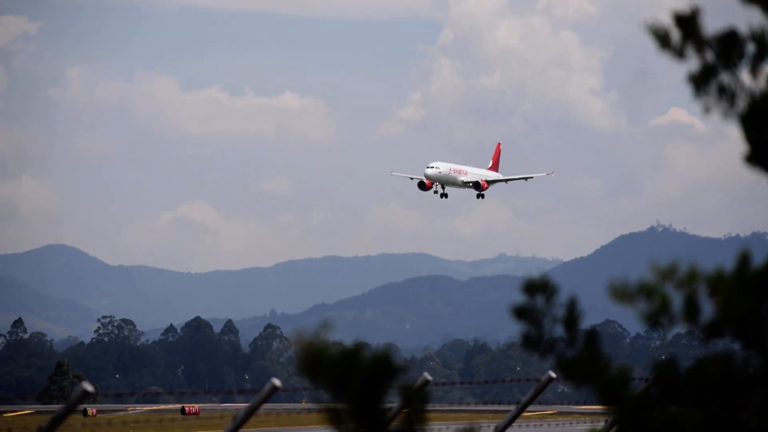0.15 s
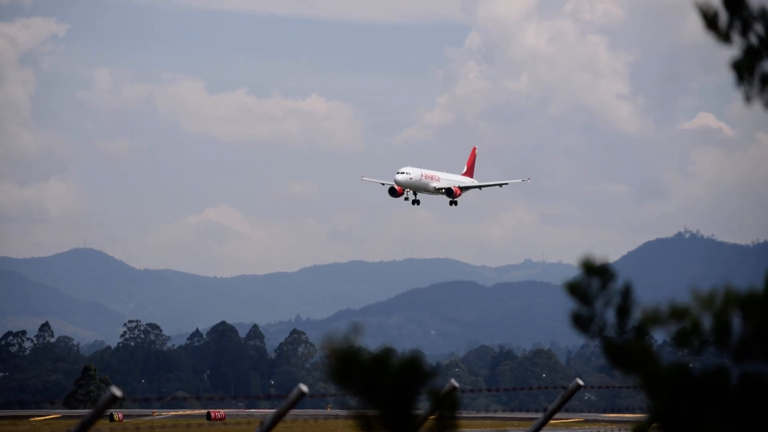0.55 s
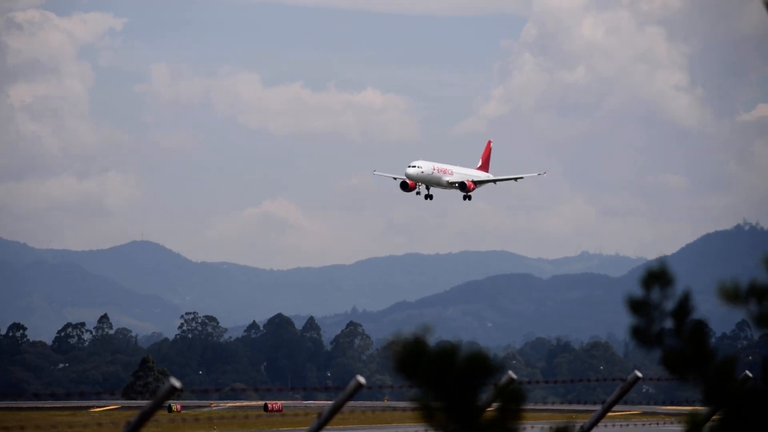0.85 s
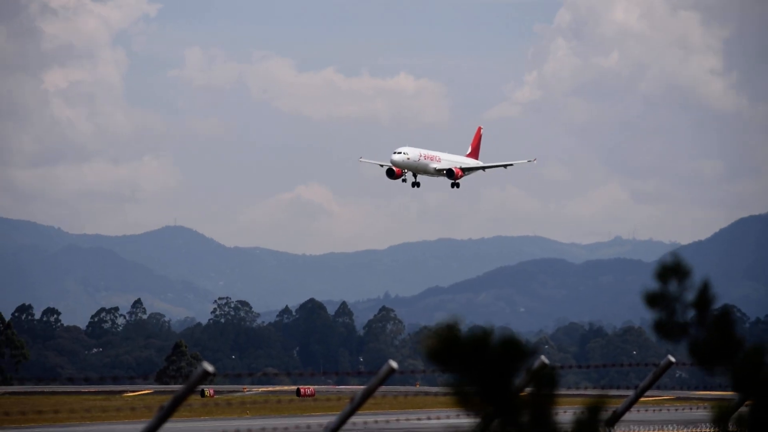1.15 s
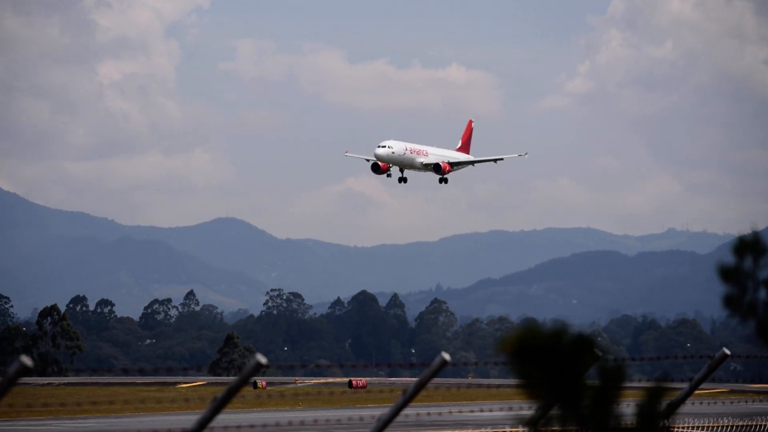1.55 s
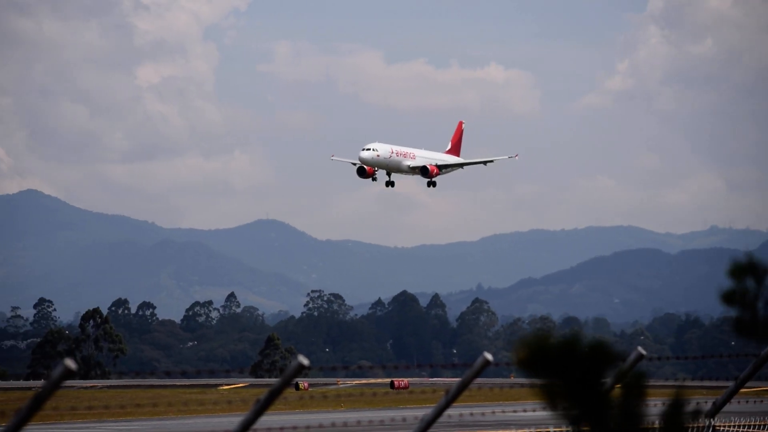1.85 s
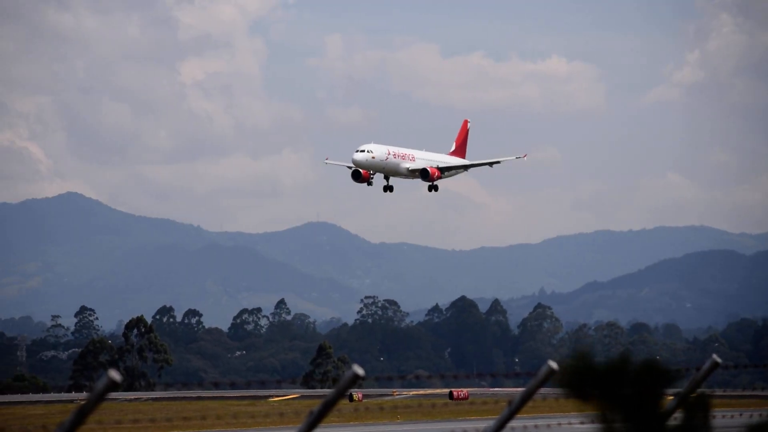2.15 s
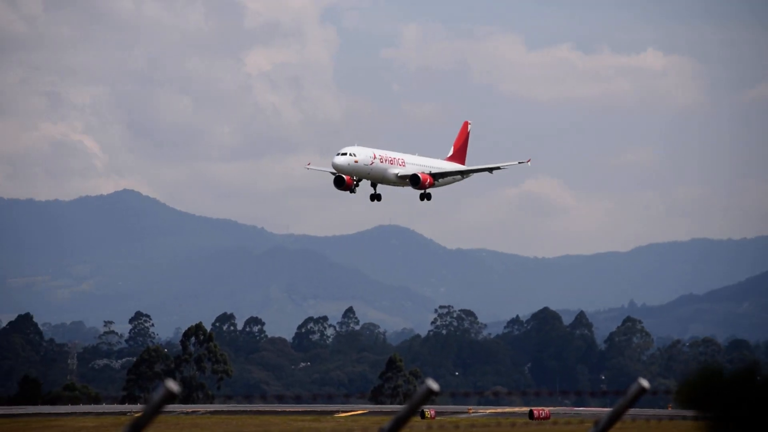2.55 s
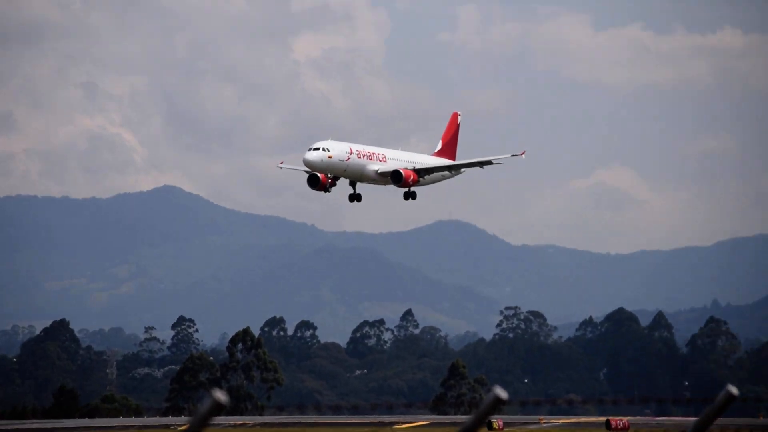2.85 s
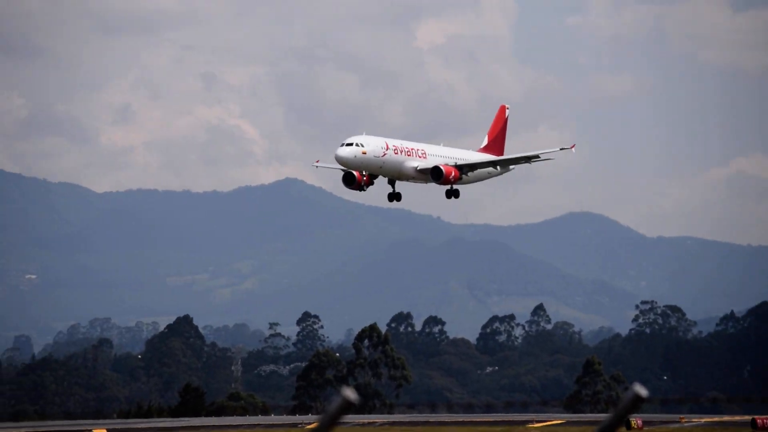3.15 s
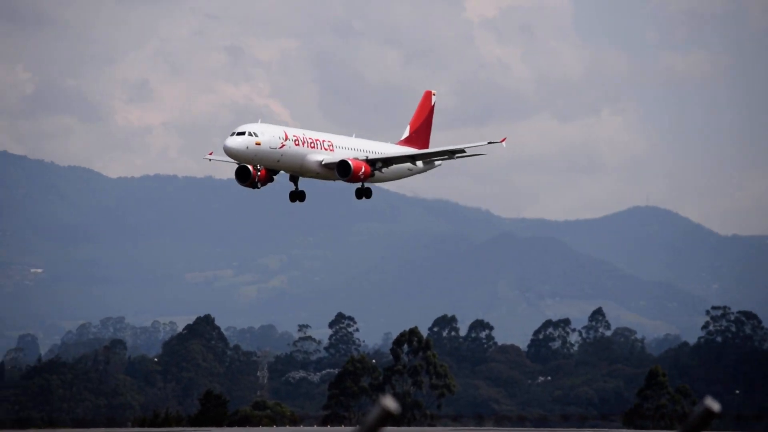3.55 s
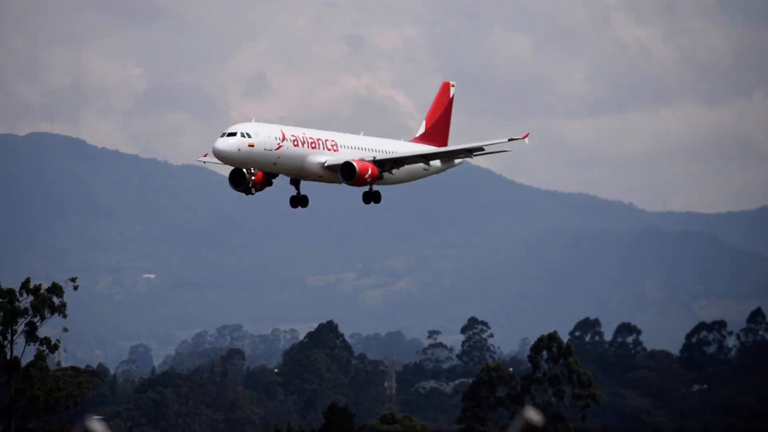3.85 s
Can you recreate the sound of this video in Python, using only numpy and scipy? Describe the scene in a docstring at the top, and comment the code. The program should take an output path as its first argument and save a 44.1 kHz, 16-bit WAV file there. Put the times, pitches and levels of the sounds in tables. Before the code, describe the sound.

Airliner's broad roar and wavering fan whine swell across an airfield, with gusts buffeting the microphone.

```python
"""A jet airliner's roar swells across an airfield on final approach, its fan whine wavering with the throttle.
Gusts break on the microphone as runs of short, dull thumps; the hand-held camera rustles and ticks.
The roar is shaped noise with a ground echo, and the whine is tones scattered by turbulence.
The wind is random eddies over a churn of noise, with single swings of pressure for the hardest blows.
Ticks and cracks are filtered snaps, rustles are grainy noise, and faint electronics hiss and whistle."""
import sys
import numpy as np
from scipy import signal
from scipy.fft import rfft, irfft
from scipy.io import wavfile
from scipy.ndimage import uniform_filter1d

SR = 44100
rng = np.random.default_rng(int(sys.argv[2]) if len(sys.argv) > 2 else 0)


def store_pcm(level_fs):
    """Save levels as 16-bit WAV."""
    pcm = np.round(np.clip(level_fs, -1, 1) * 32767).astype(np.int16)
    wavfile.write(sys.argv[1], SR, np.atleast_2d(pcm).T)


N = 176400
T = np.arange(N) / SR  # time [s]
HZ = np.maximum(np.arange(N // 2 + 1) * SR / N, 1)  # pitch of each spectrum bin, kept above zero


def from_db(db):
    """Decibels to gain."""
    return 10 ** (np.asarray(db) / 20)


def rms_one(x):
    """Scale to rms 1."""
    return x / np.sqrt(np.mean(x ** 2) + 1e-20)


def in_time(rows, outside=None):
    """Join (time [s], value) rows by straight lines."""
    s, value = np.transpose(rows)
    return np.interp(T, s, value, outside, outside)


def coloured(x, spectrum):
    """Filter by (frequency [Hz], level [dB]) points, joined over log frequency."""
    hz, db = np.transpose(spectrum)
    gain = from_db(np.interp(np.log(HZ), np.log(hz), db))
    return irfft(rfft(x) * gain, N)


def noise():
    """White noise with spread 1."""
    return rng.standard_normal(N)


def drift(rate):
    """Slow random wander with rms 1; it thins out above rate [Hz]."""
    slow = rfft(noise()) / (1 + (HZ / rate) ** 2) ** 2
    return rms_one(irfft(slow * (HZ > 1), N))


def band(x, low_hz, high_hz):
    """Causal band-pass."""
    sos = signal.butter(2, [low_hz, high_hz], "band", fs=SR, output="sos")
    return signal.sosfilt(sos, x)


# level of the jet roar, with the opening fade-in: (time [s], level [dB])
ROAR_LEVEL = [(0, -46), (.17, -22), (.3, -8), (.5, 3.5), (1.0, 2.5), (1.85, -2), (2.3, 0), (2.7, 1.5),
              (3.0, 4), (3.5, 7.5), (4, 1.5)]
# colour of engine and airframe roar before its level is set: (frequency [Hz], level per Hz [dB])
ROAR = [(30, -88), (130, -73.5), (260, -70), (400, -71.5), (640, -57), (900, -62), (1150, -60), (1500, -64),
        (1850, -62), (2120, -65), (2400, -66.5), (2650, -70.5), (3000, -73), (4700, -85.5), (5600, -95),
        (7500, -113), (16000, -145)]
# treble loss from the air and the opening fade-in, full from 5 kHz up; negative brightens: (time [s], loss [dB])
TREBLE_LOSS = [(0, -8), (.2, 11), (.45, 11), (2.0, 0.5), (2.7, 2), (3.5, -1.5), (4, -8.5)]
GROUND_ECHO, ECHO_START_S, ECHO_END_S = 0.11, 0.001683, 0.00169  # share and lag of the ground reflection
SHIMMER_DB, SHIMMER_PER_S = 1.5, 14  # flicker of each band
SWELL_DB, SWELL_PER_S = .7, 10  # waver of the whole roar


def roar():
    """Broad jet noise that fades in, its treble dulled, each band flickering, combed by its ground reflection."""
    spectrum = rfft(coloured(noise(), ROAR)) * np.sqrt(SR / 2)
    edges = np.geomspace(20, 20000, 31)
    treble_loss_db = in_time(TREBLE_LOSS)
    direct = np.zeros(N)
    for low, high in zip(edges, edges[1:]):
        slice_of_roar = irfft(spectrum * (HZ >= low) * (HZ < high), N)
        loss_db = treble_loss_db * min(low / 5000, 1)
        direct += slice_of_roar * from_db(SHIMMER_DB * drift(SHIMMER_PER_S) - loss_db)
    lag = np.linspace(ECHO_START_S, ECHO_END_S, N)
    echo = GROUND_ECHO * np.interp(T - lag, T, direct)
    level_db = in_time(ROAR_LEVEL) + SWELL_DB * drift(SWELL_PER_S)
    return (direct + echo) * from_db(level_db)


# four gusts on the microphone, each a list of (time [s], level [dB])
GUSTS = [
    [(.035, -44), (.19, -57), (.215, -41.5), (.3, -37.5), (.45, -24), (.6, -24), (.71, -31.5), (.75, -24.5),
     (.97, -32.5), (1.01, -44)],
    [(1.06, -52.5), (1.19, -27.5), (1.3, -24.5), (1.4, -33.5), (1.425, -20), (1.52, -27), (1.55, -50),
     (1.595, -48), (1.626, -28.5), (1.66, -41.5), (1.69, -22.5), (1.755, -29.5), (1.81, -43)],
    [(1.9, -52), (1.92, -23.5), (1.96, -21.5), (1.995, -32.5), (2.03, -19.5), (2.11, -29.5), (2.175, -21.5),
     (2.23, -29.5), (2.315, -26.5), (2.34, -48), (2.42, -35.5), (2.52, -58)],
    [(2.76, -57), (2.81, -35), (2.88, -26.5), (3.1, -24.5), (3.16, -21.5), (3.26, -29), (3.32, -25),
     (3.42, -31), (3.456, -21.5), (3.52, -36.5), (3.56, -15), (3.65, -30), (3.8, -21.5), (3.89, -13.5),
     (4, -20.5)],
]
# colour of the buffeting: (frequency [Hz], relative level per Hz [dB])
BUFFET = [(20, -31.5), (45, -27.5), (80, -9.5), (125, -2.5), (220, 1.5), (380, -0.5), (650, -11),
          (950, -38), (1400, -30), (2200, -40.5), (4000, -61.5)]
EDDIES_PER_S, EDDY_SPREAD_DB = 150, 1  # mean rate of the eddies and scatter in their size
EDDY_DB, CHURN_DB = 4.5, -2  # levels relative to the gust
EDGE_HZ = 766
STRONG_DB, EDGE_DB, EDGE_GROWTH = -20, -6, 1.01  # a strong gust; edge relative to it; edge dB per gust dB


def wind():
    """Eddies strike the microphone at random over a steady churn, with a harder edge that grows with the gust."""
    gust_db = np.max([in_time(gust, outside=-120) for gust in GUSTS], axis=0)
    born = rng.random(N) < EDDIES_PER_S / SR
    size_db = EDDY_SPREAD_DB * np.clip(noise(), -2, 2)
    hits = born * from_db(size_db) * rng.choice([-1, 1], N)
    # crowded moments are evened out with sparse ones
    crowding = uniform_filter1d(hits ** 2, size=1700)
    hits = hits / np.sqrt(np.abs(crowding) + 1e-4)

    eddies = from_db(EDDY_DB) * rms_one(coloured(band(hits, 60, 2500), BUFFET))
    churn = from_db(CHURN_DB) * rms_one(coloured(noise(), BUFFET))

    edge = hits * rng.random(N)
    for _ in range(2):  # twice for steeper sides
        edge = band(edge, EDGE_HZ / 2, EDGE_HZ * 1.61)
    edge_db = STRONG_DB + EDGE_DB + EDGE_GROWTH * (gust_db - STRONG_DB)
    return (eddies + churn) * from_db(gust_db) + rms_one(edge) * from_db(edge_db)


def tone(hz, width_hz, scatter):
    """A partial, partly steady and partly scattered by turbulence."""
    carrier = np.exp(2j * np.pi * np.cumsum(hz) / SR)
    turbulence = drift(2 * width_hz) + 1j * drift(2 * width_hz)
    return rms_one(np.real(carrier * (1 + scatter * turbulence)))


# blade-passing pitch of the faster fan: (time [s], frequency [Hz])
FAN = [(.3, 2312), (.75, 2293), (1.3, 2305), (1.8, 2298), (2.3, 2318), (2.7, 2351), (3.05, 2386),
       (3.42, 2386), (3.8, 2352)]
# level of the fan whine: (time [s], level [dB])
WHINE = [(0, -82), (.38, -48.5), (1.0, -48.5), (2.1, -46.5), (2.3, -31.5), (2.55, -42.5), (3.0, -42),
         (3.17, -32.5), (3.55, -34), (3.75, -38.5), (4, -37)]
# level of the fan's octave: (time [s], level [dB])
OVERTONE = [(0, -99), (.5, -65), (.8, -58.5), (1.5, -65), (2.5, -62.5), (3.15, -50), (3.4, -61),
            (3.65, -51)]
# turbine whistles at their loudest moment: (frequency [Hz], level [dB])
TURBINE = [(6580, -75), (7120, -79.5)]
TURBINE_NEAR_S, TURBINE_SPAN_S, TURBINE_SAG_HZ_PER_S = 3.1, 0.53, 47  # loudest moment, spread, fall in pitch
SECOND_FAN_HZ = 2240  # the other engine holds a lower, steady speed
SECOND_FAN_DB, SKIRT_DB = -9.5, -3.5  # relative to the fan tone; the skirt is noise around it


def whine():
    """Two fans, the faster in a skirt of noise and with its octave, and faint turbine whistles."""
    pitch = in_time(FAN) + 3 * drift(18)
    fan = tone(pitch, width_hz=9.1, scatter=0.73)
    skirt = from_db(SKIRT_DB) * tone(pitch, width_hz=24, scatter=2)
    second = from_db(SECOND_FAN_DB) * tone(np.full(N, SECOND_FAN_HZ), width_hz=35, scatter=2)
    octave = from_db(in_time(OVERTONE)) * tone(2 * pitch, width_hz=22, scatter=1)

    from_near = T - TURBINE_NEAR_S
    turbine = np.zeros(N)
    for hz, db in TURBINE:
        sagging_hz = hz - TURBINE_SAG_HZ_PER_S * from_near
        turbine += from_db(db) * tone(sagging_hz, width_hz=18, scatter=1.2)
    turbine *= np.exp(-(from_near / TURBINE_SPAN_S) ** 2)
    return (fan + skirt + second) * from_db(in_time(WHINE)) + octave + turbine


def swing(cycles):
    """One quick swing of pressure, down and up."""
    return np.sin(2 * np.pi * cycles) / np.cosh(np.clip(cycles * 3.62, -20, 20))


# the hardest single thumps of wind: (time [s], relative level [dB], frequency [Hz])
THUMPS = [(0.363, -11, 450), (0.454, -8.5, 500), (.509, -8.5, 360), (.571, -5.5, 760), (.584, -5, 510),
          (0.744, -8.5, 640), (1.29, -7, 530), (1.305, -6.5, 420), (1.424, -5, 530), (1.43, -7, 377),
          (1.435, -3, 780), (1.443, -5, 460), (1.47, -13, 480), (1.477, -9, 420), (1.502, -6.5, 710),
          (1.511, -6.5, 450), (1.69, -5, 444), (1.751, -9.5, 363), (1.918, -11.5, 543), (1.951, -6.5, 484),
          (1.974, -8, 850), (2.011, -1, 450), (2.025, 4, 520), (2.033, -3.5, 300), (2.118, -8.5, 360),
          (2.174, -5, 450), (2.185, -3.5, 620), (2.199, -8, 380), (2.213, -8, 420), (2.249, -5, 367),
          (2.262, -8, 540), (2.294, -8.5, 400), (2.963, -8.5, 460), (2.975, -2.5, 815), (3.078, -2.5, 805),
          (3.137, -7, 410), (3.307, -8, 397), (3.547, -1, 440), (3.56, -2, 445), (3.576, -14, 450),
          (3.713, -1.5, 545), (3.877, 0.5, 375), (3.895, 2, 620), (3.906, -1, 720), (3.975, -3, 530),
          (3.996, 5.5, 587)]
THUMP_DB = 4  # added to every thump
THUMP_EDGE_HZ, THUMP_EDGE_DB = 910, -6.5  # middle pitch of the edge; its level relative to the thump


def thumps():
    """A big eddy is one swing of pressure at its own pitch, with a smaller, mostly faster one riding on it."""
    out = np.zeros(N)
    for s, db, hz in THUMPS:
        edge_size, shift = rng.standard_normal(2)
        near = np.abs(T - s) < .02
        t = T[near] - s
        edge_hz = THUMP_EDGE_HZ * np.exp(0.19 * edge_size)
        edge = from_db(THUMP_EDGE_DB) * swing((t + .001 * shift) * edge_hz)
        out[near] += from_db(db + THUMP_DB) * (swing(t * hz) + edge)
    return out


PORT_TOP, PORT_HZ = .85, 2240  # pressure at which the port overloads; low-pass corner


def port(pressure):
    """The microphone port overloads on the hardest blows, which gives them a dull crackle."""
    bent = pressure / (1 + (pressure / PORT_TOP) ** 4) ** (1 / 4)
    return signal.sosfilt(signal.butter(4, PORT_HZ, fs=SR, output="sos"), bent)


def snaps(rows, low_hz, high_hz, decay_s):
    """One dry snap with a short scratchy tail for each (time [s], peak level [dB]) row."""
    out = np.zeros(N)
    for s, db in rows:
        snap = .3 * rng.standard_normal(1024) * np.exp(-T[:1024] / decay_s)
        snap[0] = 2
        snap = band(band(snap, low_hz, high_hz), low_hz, high_hz)
        start = int(s * SR)
        out[start:start + len(snap)] += from_db(db) * snap / np.abs(snap).max()
    return out


# small ticks of the camera body: (time [s], peak level of the ring [dB])
TICKS = [(1.212, -26), (1.797, -36), (2.596, -40), (3.402, -35)]
TICK_HZ, TICK_DECAY_S, TICK_SNAP_DB = 4900, .0016, -13  # ring pitch and decay; snap relative to ring
SNAP_TOP_HZ, SNAP_DECAY_S = 11900, .0003  # shared by the tick snaps and the cracks


def ticks():
    """The camera body gives thin ticks, each a bright snap and a brief ring."""
    ring = snaps(TICKS, TICK_HZ / 1.46, TICK_HZ * 1.2, TICK_DECAY_S)
    snap = snaps(TICKS, TICK_HZ, SNAP_TOP_HZ, SNAP_DECAY_S)
    return ring + from_db(TICK_SNAP_DB) * snap


# fingers brush the camera: (time [s], rms level at the height [dB], half length [s])
RUSTLES = [(1.98, -68, 0.016), (2.268, -61.5, .014), (2.874, -62.5, 0.019), (3.222, -62, 0.018),
           (3.88, -69, 0.018)]
# colour of the brushing: (frequency [Hz], relative level per Hz [dB])
RUSTLE = [(3000, -21.5), (6500, -3.5), (10000, -1), (13000, -8), (16000, -14)]


def rustles():
    """Fingers brushing the camera make soft swells of grainy noise."""
    touch = np.zeros(N)
    for s, db, half_s in RUSTLES:
        touch += from_db(db) * np.exp(-.5 * ((T - s) / half_s) ** 2)
    grain = noise() * from_db(3 * drift(400))
    return touch * rms_one(coloured(grain, RUSTLE))


# thin cracks of overload on some of the hard thumps: (time [s], peak level [dB])
CRACKS = [(2.025, -30), (3.559, -42), (3.712, -27.5), (3.876, -29), (3.895, -29.5), (3.975, -34)]


def cracks():
    """Thin, bright cracks of overload at listed moments, on some of the hard thumps."""
    return snaps(CRACKS, 2500, SNAP_TOP_HZ, SNAP_DECAY_S)


def scene():
    """The distant jet, and wind and fingers right at the microphone."""
    jet = roar() + whine()
    buffeting = port(wind() + thumps())
    handling = ticks() + rustles()
    return (jet + buffeting + handling + cracks())[None]


# colour of the even electronic hiss: (frequency [Hz], relative level per Hz [dB])
HISS = [(2000, -0.5), (9000, -2.5), (16000, -9.5)]
HISS_DB = -71  # rms once faded in
WHISTLE_HZ, WHISTLE_DB = 15719, -86  # thin whistle of the electronics; rms once faded in
FADE_IN_S = 0.47  # hiss and whistle fade in
CUTOFF_HZ = 15900


def record(dry):
    """Deep bass drops away; electronics hiss and whistle faintly; peaks are rounded at full scale; the top is cut."""
    x = signal.sosfilt(signal.butter(3, 42, "high", fs=SR, output="sos"), dry)
    hiss = from_db(HISS_DB) * rms_one(coloured(noise(), HISS))
    whistle = np.sqrt(2) * from_db(WHISTLE_DB) * np.sin(2 * np.pi * WHISTLE_HZ * T)
    x = x + (hiss + whistle) * np.minimum(T / FADE_IN_S, 1) ** 2
    limited = x / (1 + x ** 8) ** (1 / 8)
    return signal.sosfilt(signal.ellip(10, .1, 80, CUTOFF_HZ, fs=SR, output="sos"), limited)


dry = scene()
out = record(dry)
store_pcm(out)
```